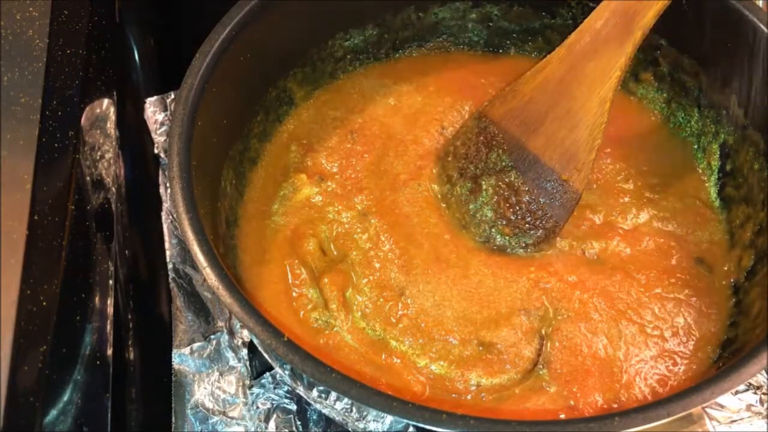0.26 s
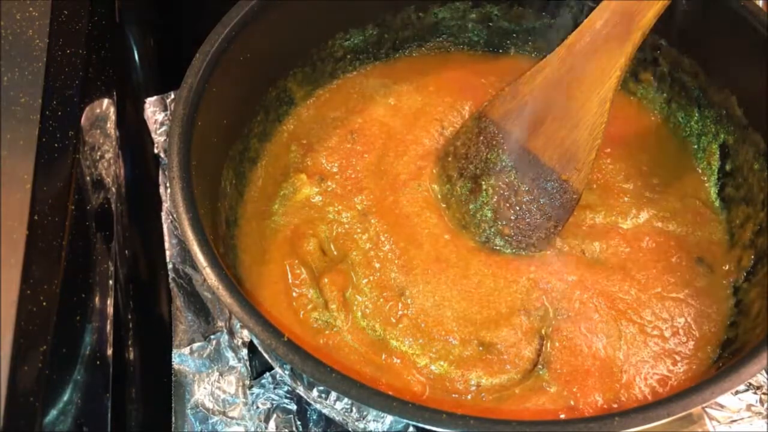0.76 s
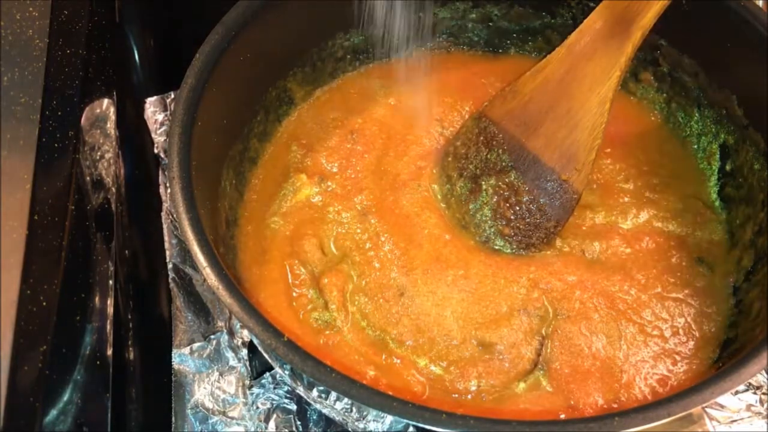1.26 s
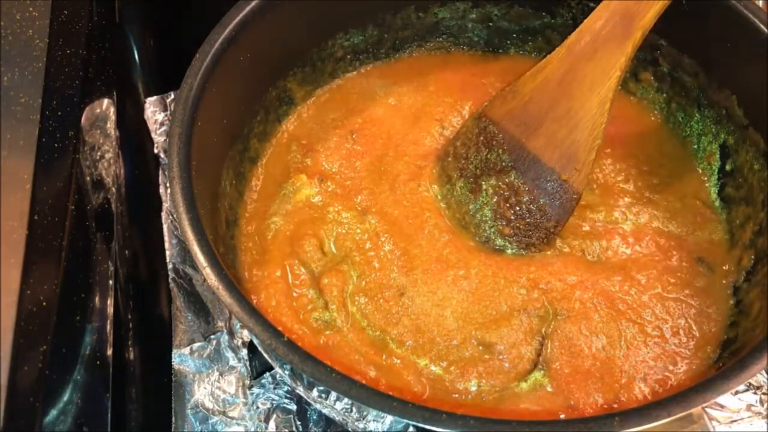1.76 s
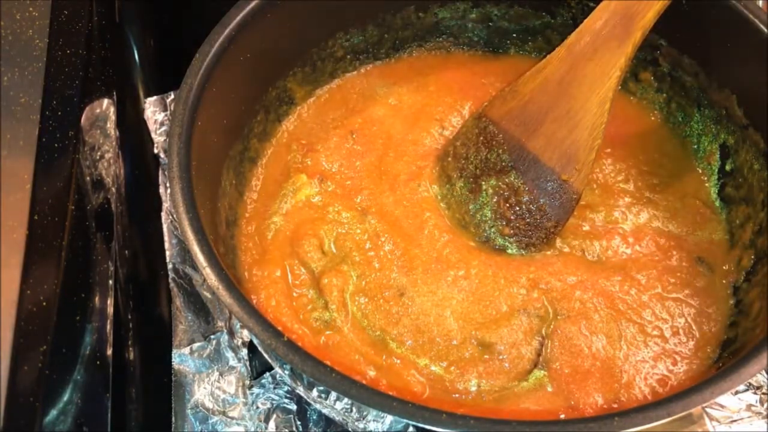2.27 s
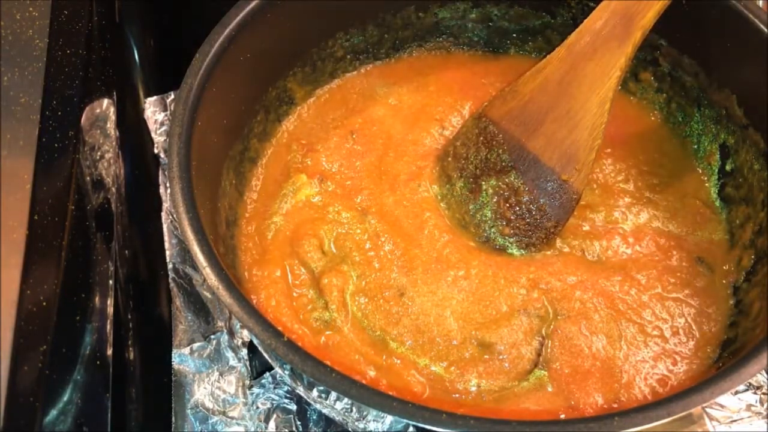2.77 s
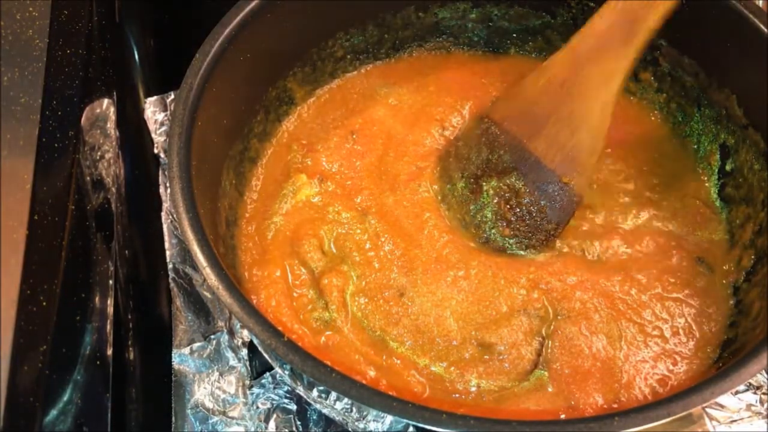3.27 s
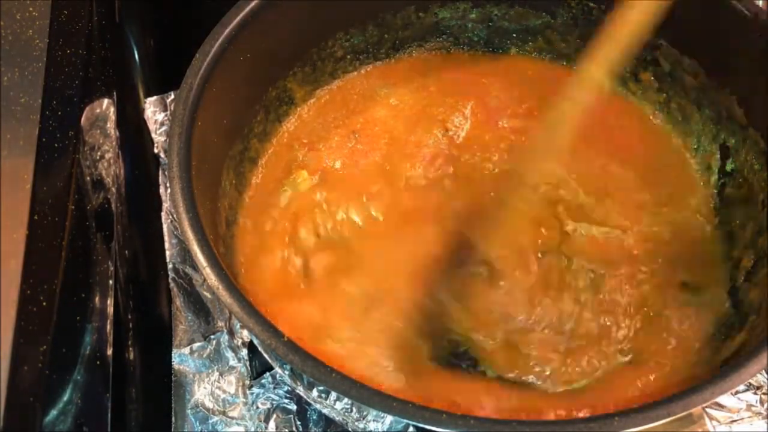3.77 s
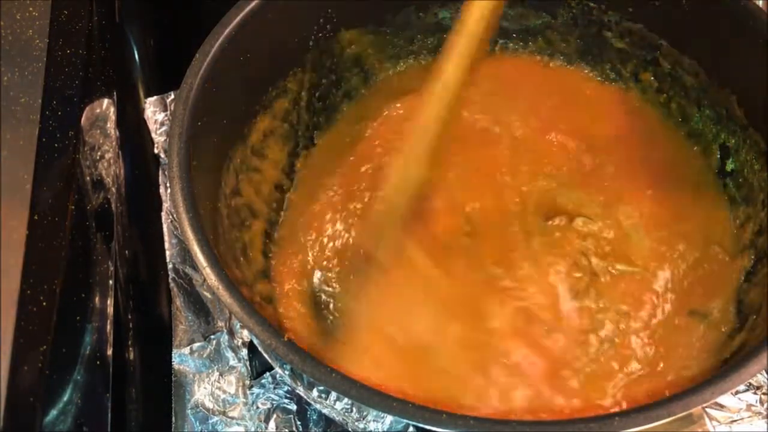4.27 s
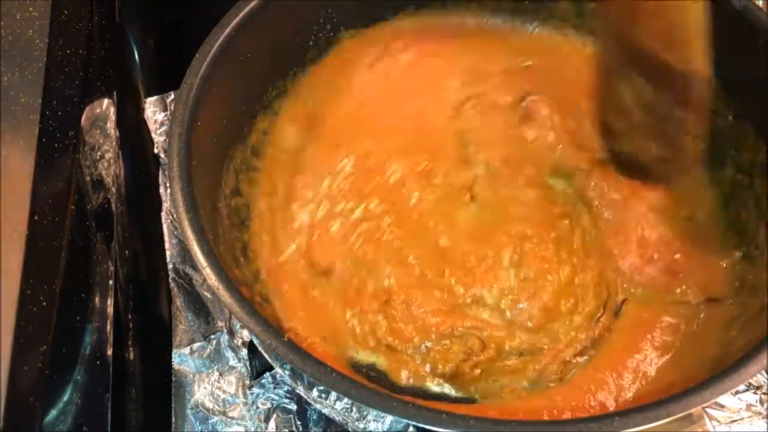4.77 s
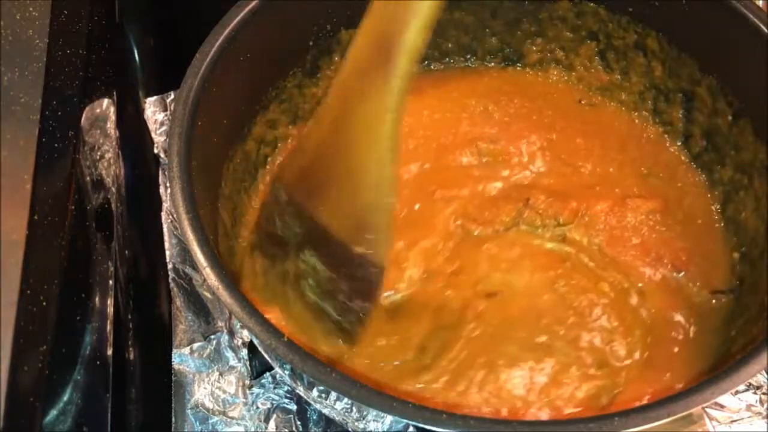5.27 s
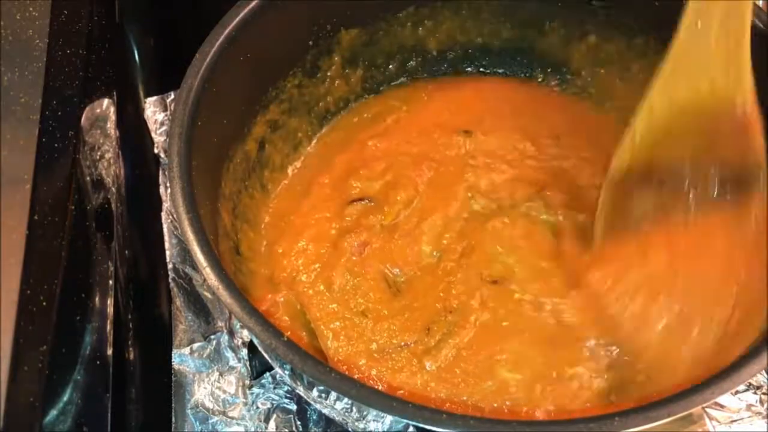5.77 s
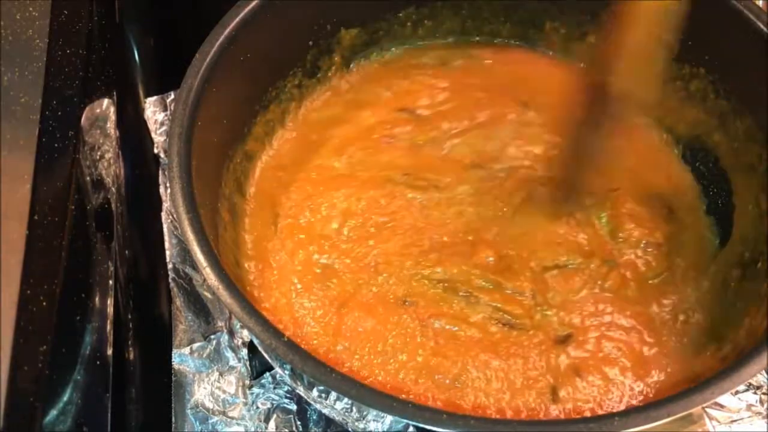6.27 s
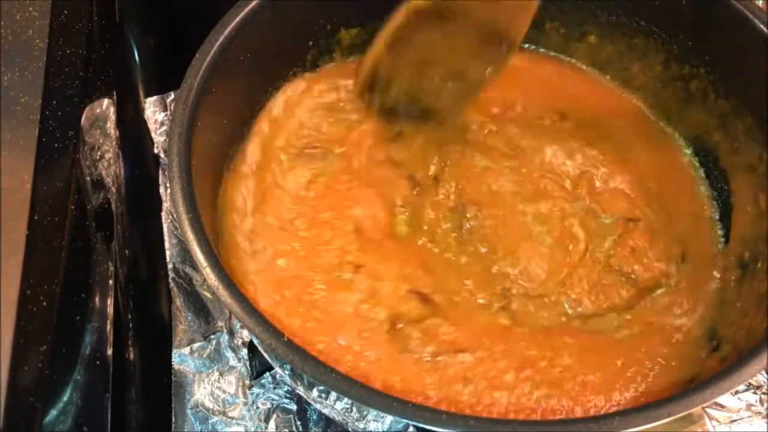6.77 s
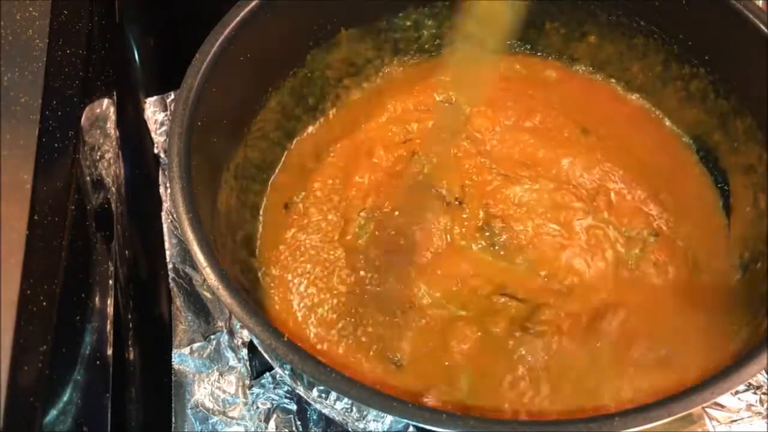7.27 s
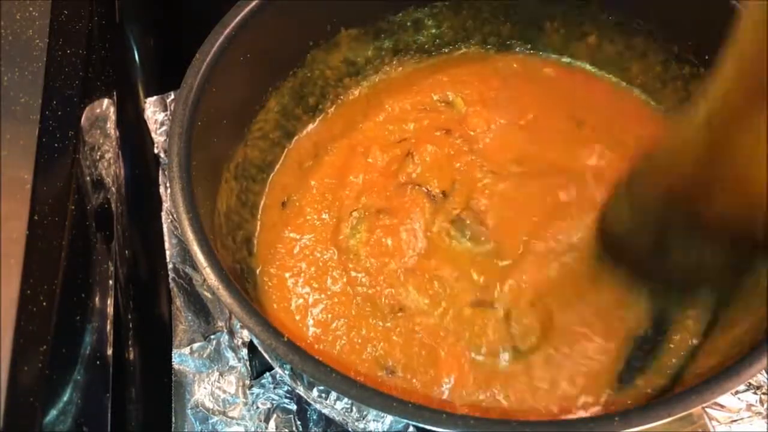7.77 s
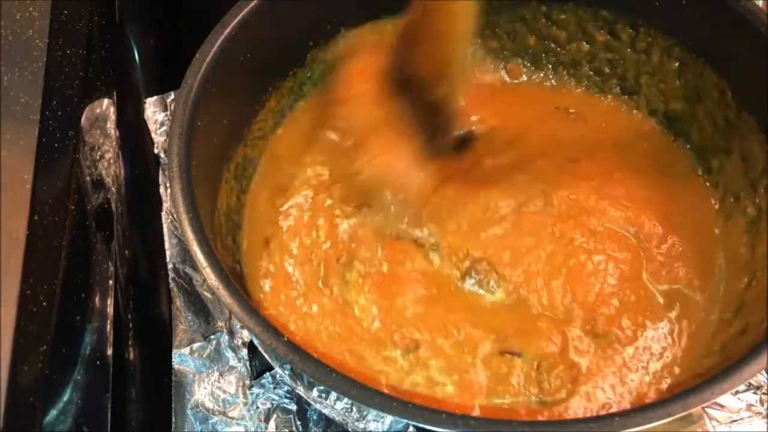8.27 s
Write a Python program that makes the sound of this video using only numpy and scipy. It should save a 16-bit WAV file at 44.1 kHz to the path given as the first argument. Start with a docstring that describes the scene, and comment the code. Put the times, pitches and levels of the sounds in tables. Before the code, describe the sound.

A salt box is shaken and set down, then thick curry is stirred with wooden knocks and scrapes against the pot.

```python
"""Salting and stirring a curry

Close microphone at the stove of a small kitchen, over a low hum. A cook shakes salt into a steel pot of
thick curry, the crystals hissing over card, then tips the box upright and sets it down. A wooden spatula
knocks the wall and scrapes the bottom; the sauce slaps, and ticks as it tears loose."""
import sys
import numpy as np
from scipy import signal
from scipy.fft import rfft, irfft
from scipy.io import wavfile
from scipy.ndimage import uniform_filter1d

SR = 44100
rng = np.random.default_rng(int(sys.argv[2]) if len(sys.argv) > 2 else 0)


def store_pcm(level_fs):
    """Save levels as 16-bit WAV."""
    pcm = np.round(np.clip(level_fs, -1, 1) * 32767).astype(np.int16)
    wavfile.write(sys.argv[1], SR, np.atleast_2d(pcm).T)


N = 375732

# room tone with the flame on: (frequency [Hz], relative density [dB])
ROOM_TONE = [(30, -16.5), (64, 1.5), (87, -7.5), (200, -9), (300, -16.5), (700, -22.5), (1500, -28.5),
             (3900, -31.5), (4800, -39.5), (5600, -34.5), (7600, -41.5), (10400, -45), (12500, -43),
             (16000, -46)]
# wavering hums and faint whines: (centre [Hz], width [Hz], level [dB])
HUMS = [(59.2, 5.3, -59), (114.3, 11.3, -60.5), (157.6, 7, -57), (589.7, 20, -71), (1201, 76, -73),
        (3033, 20, -76)]
# ticks of the box being closed, then of sticky sauce: (time [s], peak [dB], centre [Hz])
TICK_EVENTS = [(2.1077, -38, 13100), (2.174, -47, 12000), (2.213, -42, 13600), (2.23, -40.5, 3480),
               (2.254, -43, 3730), (2.284, -37, 14600), (2.2994, -44.5, 6130), (2.4653, -43, 10100),
               (2.5043, -42, 11100), (2.5123, -36, 3330), (4.4258, -38.5, 12600), (4.596, -37, 13200),
               (5.992, -43.5, 5230), (6.041, -42.5, 4060), (6.903, -44, 3870), (4.348, -38, 12500),
               (4.383, -44, 12000), (5.174, -47.5, 6760), (7.285, -49, 5000)]
# the box landing and bouncing on the counter: (time [s], gain [dB])
BOX_BOUNCES = [(2.616, -31), (2.6232, -24.5), (2.6893, -33), (2.7481, -38.5)]
# modes of the hollow box: (frequency [Hz], level [dB], t60 before damping [s])
BOX_MODES = [(360, 6, 0.026), (1245, 6, 0.06), (1705, 1, 0.12), (2570, -10.5, 0.26), (2880, 3, 0.054)]
# shakes of the salt box: (peak time [s], level [dB])
SALT_SHAKES = [(.1, -60.5), (.283, -59.5), (.457, -58), (.632, -60), (.82, -61.5), (1.018, -62.5),
               (1.202, -66), (1.398, -65.5)]
# salt sliding back as the box tips upright: (peak time [s], level [dB], half length [s])
SALT_RUSHES = [(1.657, -39.5, 0.028), (1.743, -33, 0.057), (1.903, -59.5, 0.022)]
# hiss of salt on card: (frequency [Hz], relative density [dB])
SALT_SPECTRUM = [(500, -21), (1600, -15.5), (2700, -7.5), (4860, -8.5), (6300, -5.5), (9000, -5.5),
                 (10400, -8), (11800, -2), (16000, -9.5)]
# fine crackle of the handled box, then of the sauce film on the hot wall: (time [s], gain [dB])
CRACKLE_GAIN = [(2.05, -69.5), (2.6, -67.5), (2.7, -86), (3.27, -94), (3.3, -74), (3.5, -66.5),
                (4.0, -71.5), (4.3, -64), (4.7, -68.5), (6.1, -68), (6.4, -76.5), (7.3, -75.5),
                (8.52, -78.5)]
# modes of the sauce-filled steel pot: (frequency [Hz], level [dB], t60 before damping [s])
POT_MODES = [(117.8, -10.5, 0.72), (158.3, -3.5, 0.33), (209.3, -2, 0.1), (293, -7, 0.29), (417, -3, 0.31),
             (595, 0, 0.14), (727, 1, 0.1), (905, 5, 0.068), (1173, 1, 0.11), (1304, -1.5, 0.096),
             (1756, -4, 0.063), (2217, -14, 0.24), (2500, -12, 0.179), (3140, -14.5, 0.12),
             (3870, -8, 0.033), (4380, -17.5, 0.081), (5380, -16, .08), (6240, -10.5, 0.12),
             (6820, -18.5, 0.049)]
# the wood catching one spot of the wall: (start [s], end [s], gain [dB], pitch [Hz])
WALL_CATCHES = [(4.122, 4.148, -41, 5260), (4.177, 4.205, -47, 5400), (4.18, 4.215, -42, 6750),
                (4.98, 5.022, -44.5, 1210), (5.0, 5.091, -42, 1750), (5.677, 5.717, -41.5, 1150),
                (6.928, 7.023, -59, 2700), (7.652, 7.84, -43.5, 417), (7.70, 7.76, -48, 1210)]
# rasp of wood on steel: (frequency [Hz], relative density [dB])
RASP_SPECTRUM = [(2000, 15.5), (3500, -1), (4800, -5.5), (6900, 1), (10400, -10), (12500, -9), (16000, -17)]
# spatula drags: (start [s], end [s], ease [s], rasp at start [dB], rasp at end [dB], wall drone [dB],
# dry edge [dB], pot shudder [dB], wet slap [dB]), the last four relative to the rasp
SPATULA_STROKES = [(3.282, 3.52, 0.011, -63.5, -66.5, -1.5, 1.5, -17, -24),
                   (4.109, 4.22, 0.02, -49, -46.5, -2, 6, 6, -5),
                   (4.948, 5.085, 0.016, -42.5, -44, 1.5, -3.5, -3.5, -2),
                   (5.314, 5.393, 0.024, -51.5, -50, -0.5, -4.5, 8.5, -5.5),
                   (5.459, 5.583, 0.016, -48.5, -42.5, -4, 5.5, -6, -10.5),
                   (5.57, 5.698, 0.023, -53, -49.5, 5.5, 4, -12, 1.5),
                   (5.69, 5.715, 0.019, -39.5, -45, 5.5, 8.5, -5, 1),
                   (5.79, 5.847, 0.011, -69, -57.5, -6, 5, 2, -3),
                   (6.914, 7.004, 0.022, -62.5, -63, -4, -6, 12, 5),
                   (7.004, 7.193, 0.062, -62.5, -68, 6.5, 9.5, 22.5, 20),
                   (7.594, 7.791, 0.081, -38.5, -45.5, -3.5, 0, -8, -10),
                   (8.233, 8.37, 0.018, -62, -68.5, 7, -22, 15, 0)]
# after a blow the edge skids on and the sauce settles:
# (time [s], rasp [dB], wall [dB], edge [dB], shudder [dB], slap [dB], fade time [s])
SKIDS = [(3.529, -47.5, -71, -48.5, -25.5, -31.5, 0.48), (4.085, -59, -59, -43, -27, -29.5, 0.16),
         (4.164, -68, -57, -70, -29, -33.5, 0.28), (4.235, -59, -62, -58, -56, -48, 1.16),
         (4.9, -42.5, -39, -46.5, -31, -28, 0.25), (5.728, -60, -55, -57.5, -51, -48, 0.31),
         (6.464, -51.5, -40, -58.5, -40, -37, 0.41), (6.899, -72, -57, -70, -35.5, -56, 0.22),
         (7.429, -51, -43.5, -55, -32, -45, 0.54), (7.549, -75, -72, -57.5, -60, -52.5, 1),
         (8.208, -54.5, -58, -55, -33.5, -39, 0.22)]
# fall over one fade time: (rasp [dB], wall [dB], edge [dB], shudder [dB], slap [dB])
SKID_FALL = (34.4, 60, 45, 51.6, 70)
# spatula blows: (time [s], gain [dB], wood pitch [Hz], t60 before damping [s], thump [dB], ring [dB],
# crack [dB]), the last three relative to the gain
SPATULA_BLOWS = [(3.513, -15.5, 1088, 0.11, -21, 5.5, -15), (3.515, -5, 2070, 0.036, -21, -2, -4.5),
                 (3.597, -4, 830, 0.043, -22, -40, -30), (4.076, -30, 1150, 0.12, -2.5, 8.5, 13),
                 (4.16, -26.5, 820, 0.066, -8.5, -29, -24), (4.89, -12, 784, 0.036, -12.5, -30, -18),
                 (5.318, -39.5, 1860, 0.072, -2, -18, -6), (6.451, -9, 1170, 0.028, -16, -21, -28),
                 (7.025, -30.5, 900, 0.04, -1.5, -37, -18), (7.41, -10.5, 645, 0.04, -19.5, 6, -5.5),
                 (8.202, -26.5, 643, 0.081, -5.5, -40, -18)]


def undb(db):
    return 10 ** (np.asarray(db) / 20)


def unit(x):
    """Scale to rms 1."""
    return x / np.sqrt(np.mean(x ** 2))


def colour(x, tone):
    """Filter x by a curve of (frequency [Hz], gain [dB]) points."""
    hz, db = np.transpose(tone)
    f = np.maximum(np.fft.rfftfreq(len(x), 1 / SR), 1)
    return irfft(rfft(x) * undb(np.interp(np.log(f), np.log(hz), db)), len(x))


def band(x, lo_hz, hi_hz):
    sos = signal.butter(2, [lo_hz, min(hi_hz, .45 * SR)], "bandpass", fs=SR, output="sos")
    return signal.sosfilt(sos, x)


def add(out, s, x):
    """Mix x into out at s seconds."""
    i = int(s * SR)
    out[i:i + len(x)] += x[:len(out) - i]


def wander(per_s):
    """Random drift with a spread of about 1."""
    s = np.arange(0, N / SR + 1, 1 / per_s)
    return 1.2 * np.interp(np.arange(N) / SR, s, rng.standard_normal(len(s)))


def grains(per_s, spread_db):
    """Random clicks, many small and a few large."""
    clicks = (rng.random(N) < per_s / SR) * rng.standard_normal(N)
    return clicks * undb(spread_db * rng.exponential(size=N))


def decay(t60, length):
    """Envelope that falls 60 dB in t60 seconds."""
    return undb(-60 * np.arange(length) / SR / t60)


def burst(t60, lo_hz, hi_hz, length=6000):
    """Decaying noise in a band, peak 1."""
    x = band(rng.standard_normal(length) * decay(t60, length), lo_hz, hi_hz)
    return x / np.abs(x).max()


def ring(modes, lo_hz=0, hi_hz=SR, damp=0.53, spot_db=0., length=12000):
    """Struck modes in a band; damp scales each t60, the spot struck sets each sign and share."""
    t = np.arange(length) / SR
    out = np.zeros(length)
    for hz, db, t60 in modes:
        if lo_hz <= hz < hi_hz:
            share = rng.choice([-1, 1]) * undb(db + spot_db * rng.standard_normal())
            out += share * np.sin(2 * np.pi * hz * t) * decay(t60 * damp, length)
    return out


def rubbed_pot(drive, lo_hz, hi_hz, damp, spot_db):
    """Pot modes driven by clicks; each mode's share drifts as the contact travels."""
    out = np.zeros(N)
    for mode in POT_MODES:
        if lo_hz <= mode[0] < hi_hz:
            share = undb(spot_db * wander(9.7))
            out += signal.oaconvolve(drive * share, ring([mode], damp=damp, length=3500))[:N]
    return unit(out)


def patchy(x, lo_hz, hi_hz, depth_db):
    """Overlapping bands of x swell and fade apart, as the contact finds other spots."""
    centres = np.log(np.geomspace(lo_hz, hi_hz, num=30))
    log_hz = np.log(np.maximum(np.fft.rfftfreq(N, 1 / SR), 1))
    spectrum = rfft(x)
    bands = (irfft(spectrum * np.interp(log_hz, centres, one), N) for one in np.eye(30))
    return unit(sum(undb(depth_db * wander(18)) * part for part in bands))


def kitchen(air_db=-56.5):
    """The bed: steady noise of flame and room, with bass hums and faint whines."""
    air = colour(rng.standard_normal(N), ROOM_TONE)
    air *= undb(air_db) / band(air, 159, 14930).std()
    hums = sum(undb(db) * unit(band(rng.standard_normal(N), hz - width / 2, hz + width / 2))
               for hz, width, db in HUMS)
    return air + hums


def reflections(near, t60=0.41, dull_hz=3640, build_s=0.0043):
    """The short tail of a small kitchen whose walls swallow the treble."""
    t = np.arange(int(t60 * SR)) / SR
    tail = rng.standard_normal(len(t)) * decay(t60, len(t)) * np.minimum(t / build_s, 1)
    tail = signal.lfilter(*signal.butter(1, dull_hz, fs=SR), tail)
    return signal.fftconvolve(near, tail / np.sqrt(np.sum(tail ** 2)))[:N]


def ticks():
    """Short bright clicks as the box closes and, later, as sauce tears loose."""
    out = np.zeros(N)
    for s, db, hz in TICK_EVENTS:
        add(out, s, undb(db) * burst(0.042, hz * 0.6, hz * 1.48))
    return out


def box():
    """The hollow box clacks on the counter and bounces."""
    out = np.zeros(N)
    for s, db in BOX_BOUNCES:
        body = undb(-5) * ring(BOX_MODES, length=6000)
        clack = undb(-1) * burst(0.18, 430, 3150)
        click = undb(-17.5) * burst(0.078, 4000, 17000)
        add(out, s, undb(db) * (body + clack + click))
    return out


def salt(shake_half_s=0.063, trickle_db=-68):
    """Thousands of crystals slide over card: a hiss that swells and fades, over a thin trickle."""
    t = np.arange(N) / SR
    swells = [(s, db, shake_half_s) for s, db in SALT_SHAKES] + SALT_RUSHES
    power = sum(undb(db) ** 2 * np.exp(-((t - s) / half) ** 2) for s, db, half in swells)
    power += undb(trickle_db) ** 2 * np.clip(1 - t / 2.2, 0, 1)
    return np.sqrt(power) * unit(colour(grains(15000, 0.85), SALT_SPECTRUM))


def crackle():
    """Fine treble from the handled box, then from sauce thinning on the hot wall."""
    pops = signal.oaconvolve(grains(260, 2.5), burst(.02, 10500, 15500, length=900))[:N]
    pops = unit(band(pops, 10500, 15500))
    fizz = undb(3 + 1.4 * wander(31)) * unit(band(grains(6000, 3.3), 7750, 23000))
    db = np.interp(np.arange(N) / SR, *np.transpose(CRACKLE_GAIN), left=-np.inf, right=-np.inf)
    return uniform_filter1d(undb(db), size=200) * (pops + fizz)


def sauce(shudder_gain, slap_gain):
    """Thick sauce rocks the pot on its grate and slaps its lower wall."""
    shudder = rubbed_pot(grains(600, 1.13), 0, 260, damp=0.64, spot_db=0.85)
    lumps = grains(900, 1.46)
    wall = rubbed_pot(lumps, 260, 1000, damp=0.31, spot_db=5.1)
    slap = unit(wall + undb(-3) * unit(band(lumps, 374, 930)))
    return shudder_gain * shudder + slap_gain * slap


def singing_wall(t60=0.0297):
    """The rubbing wood catches one spot and the wall sings briefly on a single pitch."""
    out = np.zeros(N)
    for s, end, db, hz in WALL_CATCHES:
        length = int((end - s) * SR)
        rub = np.sin(np.linspace(0, np.pi, length)) * rng.standard_normal(SR)[:length]
        mode = ring([(hz, 0, t60)], damp=1, length=3000)
        add(out, s, undb(db) * signal.fftconvolve(rub, mode / np.sqrt(np.sum(mode ** 2))))
    return out


def stirring_gains():
    """Gains of rasp, wall, edge, shudder and slap: strokes grip, hold and lift off; skids fade away."""
    t = np.arange(N) / SR
    power = np.zeros((5, N))
    for s, end, ease, start_db, end_db, *above_db in SPATULA_STROKES:
        hold = np.clip(np.minimum((t - s) / ease, 1 + (end - t) / ease), 0, 1)
        rasp = hold ** 2 * undb(np.interp(t, [s, end], [start_db, end_db]))
        power += np.outer(undb([0, *above_db]), rasp) ** 2
    for s, *db, fade_s in SKIDS:
        fall_db = np.outer(SKID_FALL, np.maximum(t - s, 0) / fade_s)
        power += (t > s) * undb(np.array(db)[:, None] - fall_db) ** 2
    return uniform_filter1d(np.sqrt(power), size=200)


def scrape(rasp_gain, wall_gain, edge_gain):
    """The wooden edge sticks and slips; the slips rasp and drive the wall modes."""
    slips = grains(6000, 0.32) * undb(1.3 * wander(90))  # the grip on the steel is never even
    grit = patchy(colour(slips, RASP_SPECTRUM), 2400, 16000, depth_db=3.5)
    rasp_ring = undb(-2.5) * rubbed_pot(slips, 3000, 6000, damp=0.35, spot_db=3)
    wall_ring = rubbed_pot(slips, 1000, 2400, damp=0.43, spot_db=5.2)
    edge_ring = undb(-10) * rubbed_pot(slips, 6000, 7500, damp=0.37, spot_db=2)
    rasp = unit(band(grit, 3070, 5030)) + rasp_ring
    wall = unit(unit(band(slips, 1200, 2040)) + wall_ring)
    edge = unit(unit(band(grit, 7200, 20000)) + edge_ring)
    # neighbouring filters flip phase where they meet, so the top band is inverted to join without a gap
    return rasp_gain * rasp + wall_gain * wall - edge_gain * edge


def knocks(length=12000):
    """Spatula on steel, close up: a dull wooden knock, the pot's thump and ring, and a short crack."""
    out = np.zeros(N)
    for s, db, hz, t60, thump_db, ring_db, crack_db in SPATULA_BLOWS:
        wood_noise = undb(-9) * band(burst(t60, hz * .4, hz * 1.6, length), hz / 4, hz * 2)
        wood = ring([(hz, 0, t60)]) + wood_noise
        low_wall = undb(-16.5) * ring(POT_MODES, 500, 1800, damp=0.44, spot_db=3.5)
        high_wall = undb(ring_db) * ring(POT_MODES, 1800, 2800, damp=0.36)
        crack = burst(0.04, 1860, 7000, length) + undb(-3) * ring(POT_MODES, lo_hz=3500)
        tail = undb(-8.5) * burst(0.14, 1300, 2900, length)  # many faint modes blur together
        thump = undb(thump_db) * ring(POT_MODES, hi_hz=500)
        press = np.minimum(np.arange(length) * hz / SR, 1)  # wood takes a cycle to press in
        blow = press * (wood + thump) + low_wall + high_wall + undb(crack_db) * (crack + tail)
        add(out, s, undb(db) * blow)
    return out


def scene(reflections_db=-21.5):
    """Mono, close to the pot: mostly direct sound, with the kitchen well behind it."""
    rasp, wall, edge, shudder, slap = stirring_gains()
    near = salt() + scrape(rasp, wall, edge) + sauce(shudder, slap) + crackle()
    near += knocks() + box() + ticks() + singing_wall()
    return (near + undb(reflections_db) * reflections(near) + kitchen())[None]


def record(dry, bass_cut_hz=59.4, top_hz=15800):
    """The microphone path cuts the deep bass and the top."""
    dry = signal.sosfilt(signal.butter(2, bass_cut_hz, "highpass", fs=SR, output="sos"), dry)
    return signal.sosfilt(signal.ellip(10, .2, 90, top_hz, fs=SR, output="sos"), dry)


dry = scene()
out = record(dry)
store_pcm(out)
```